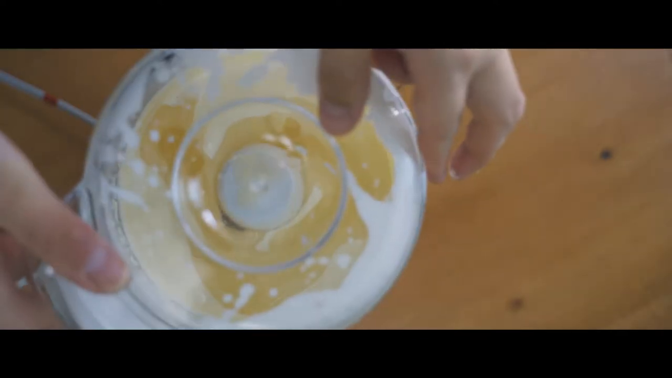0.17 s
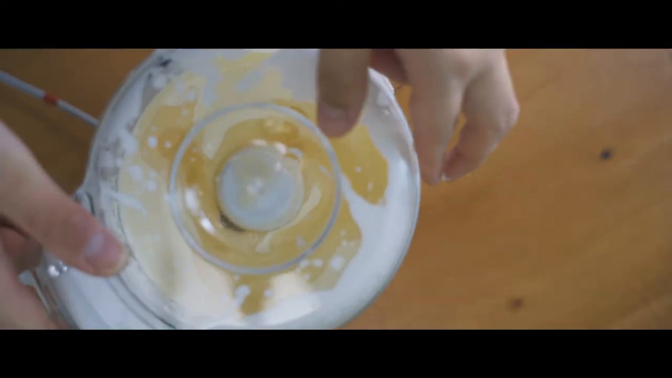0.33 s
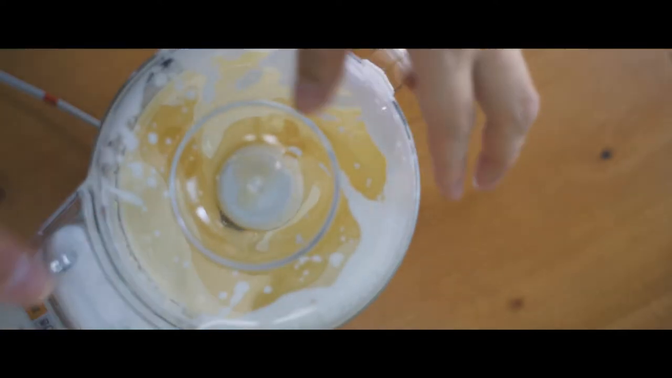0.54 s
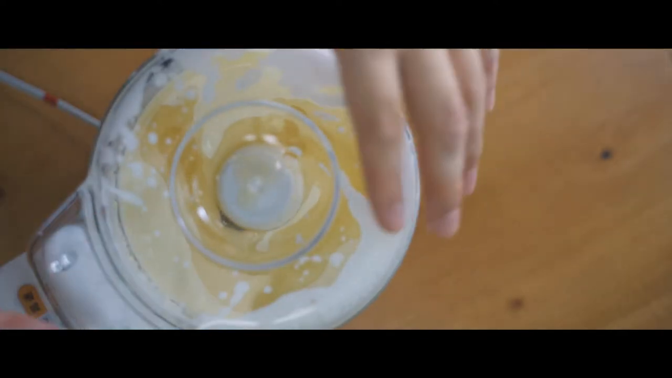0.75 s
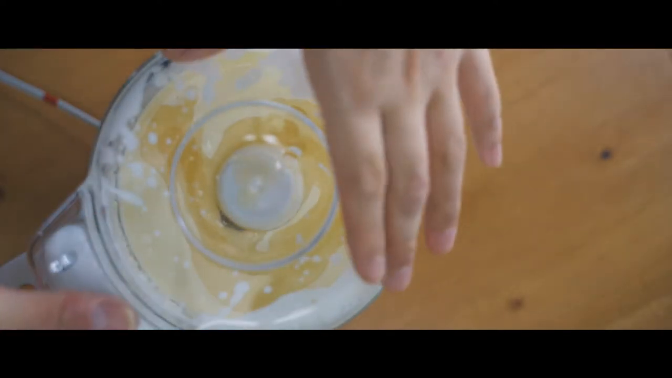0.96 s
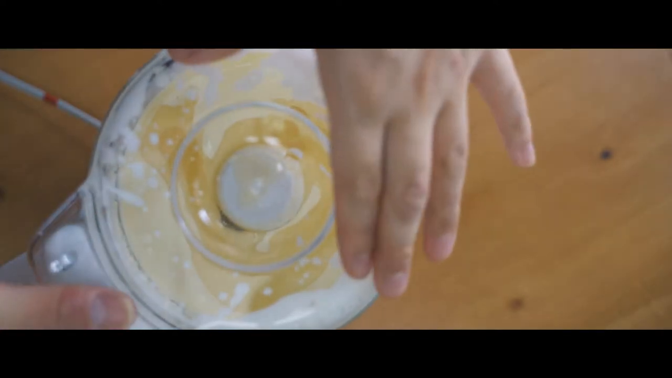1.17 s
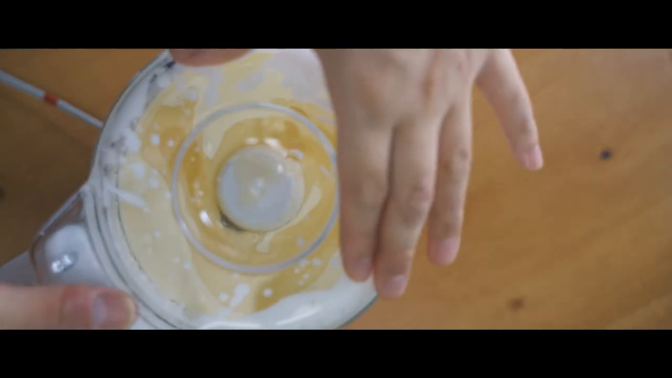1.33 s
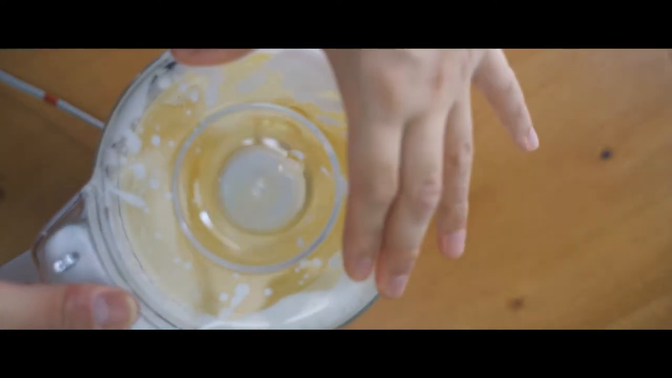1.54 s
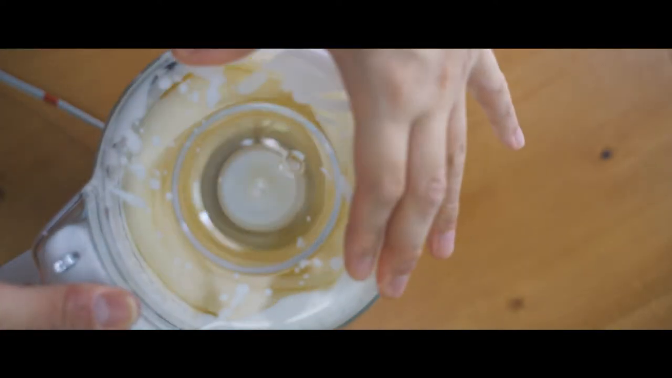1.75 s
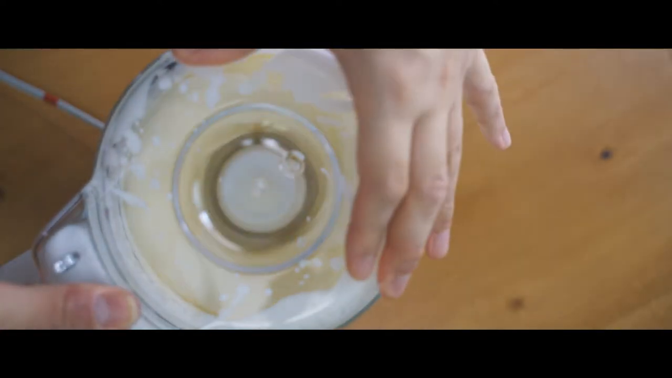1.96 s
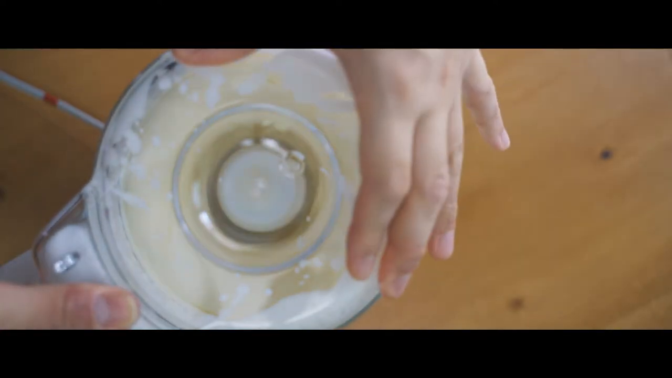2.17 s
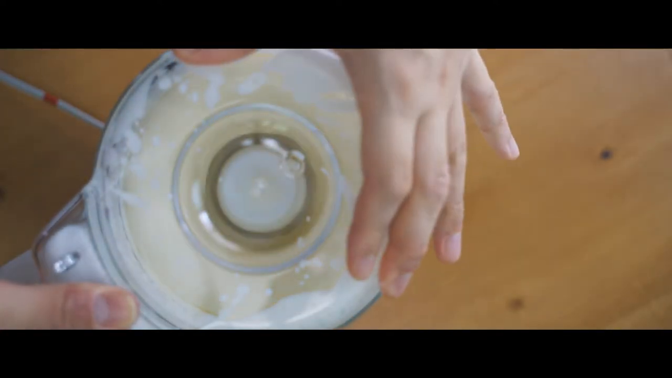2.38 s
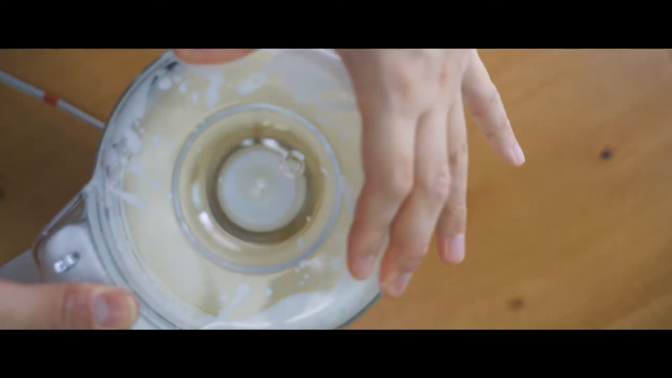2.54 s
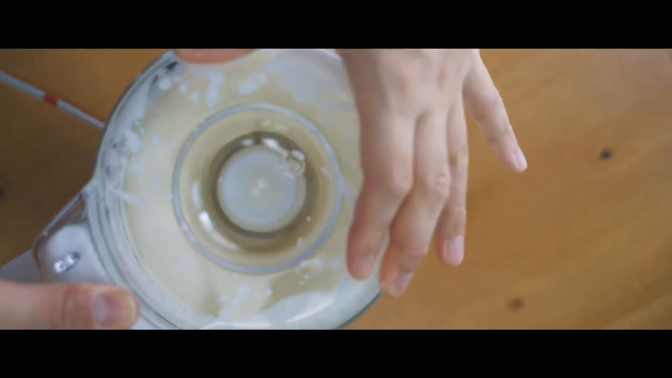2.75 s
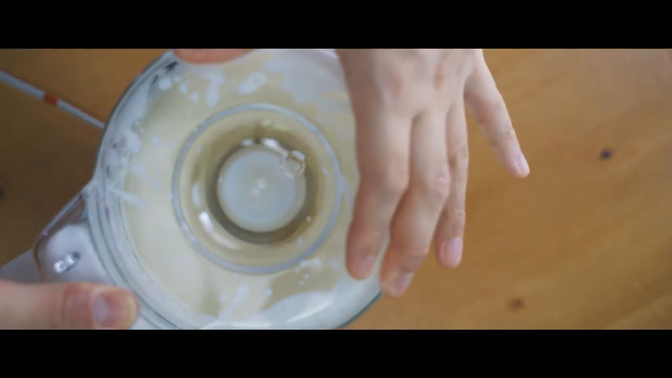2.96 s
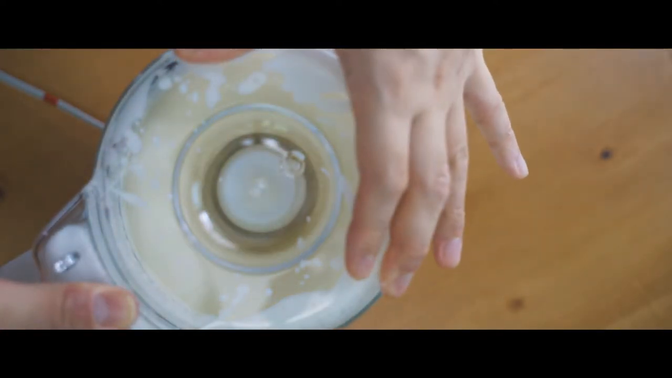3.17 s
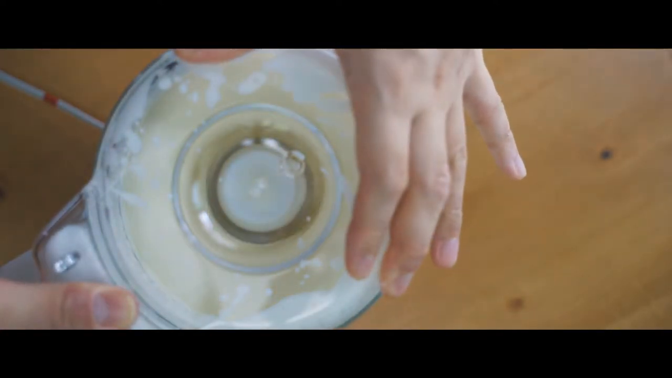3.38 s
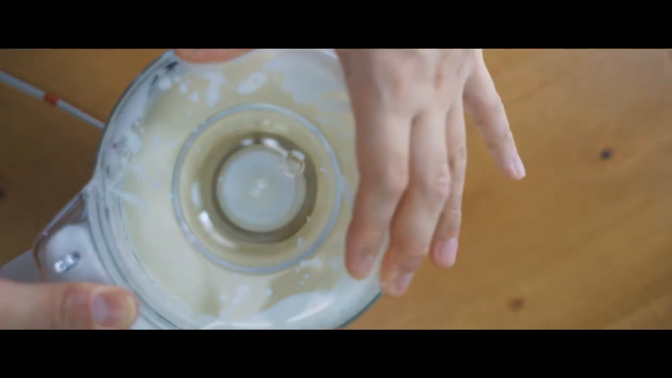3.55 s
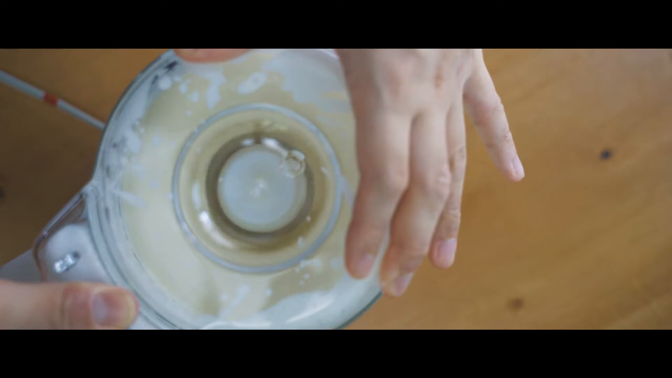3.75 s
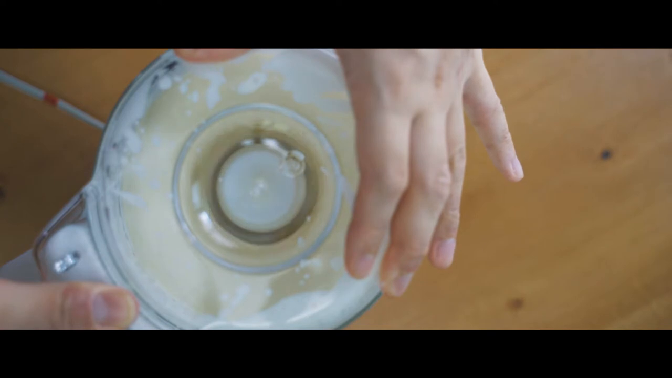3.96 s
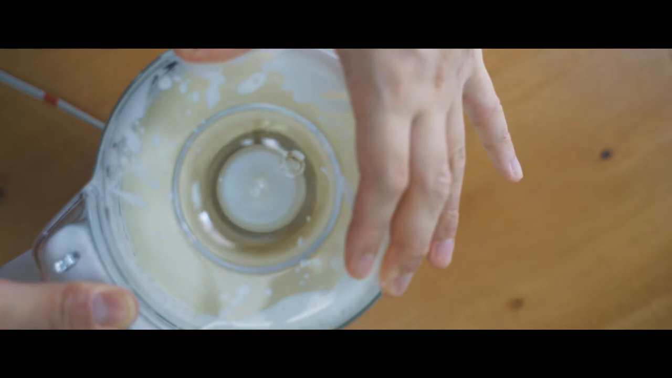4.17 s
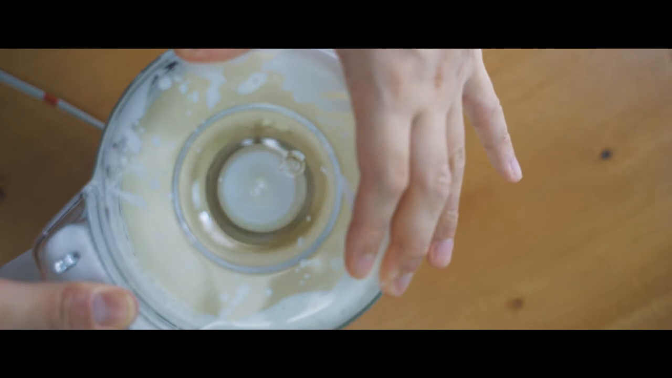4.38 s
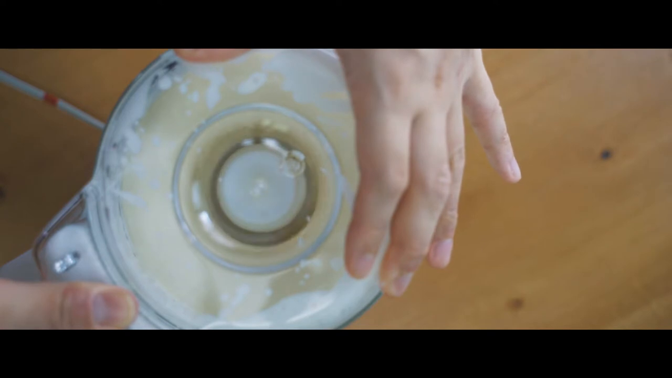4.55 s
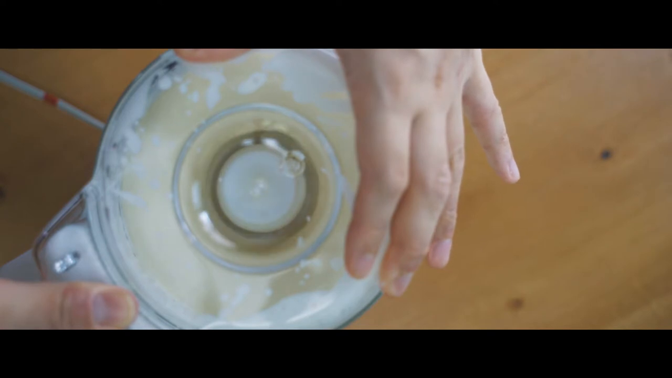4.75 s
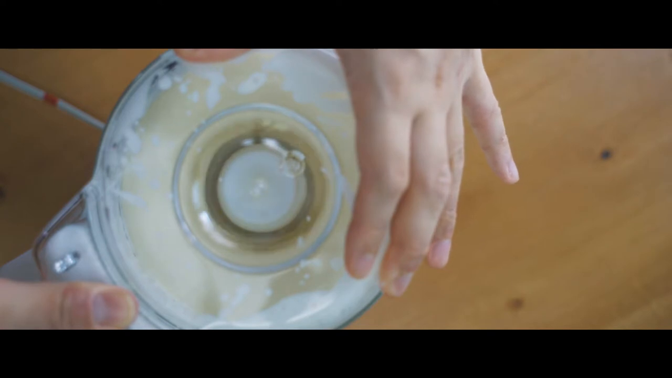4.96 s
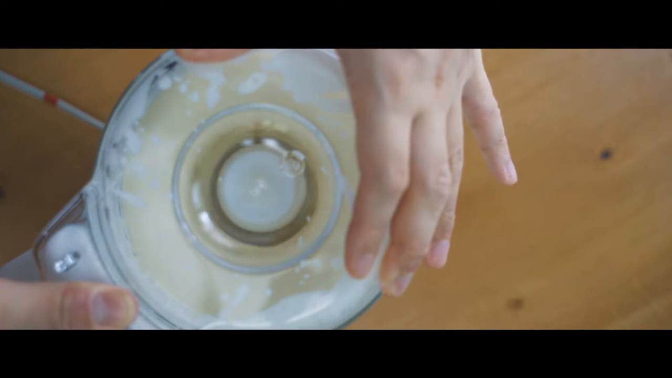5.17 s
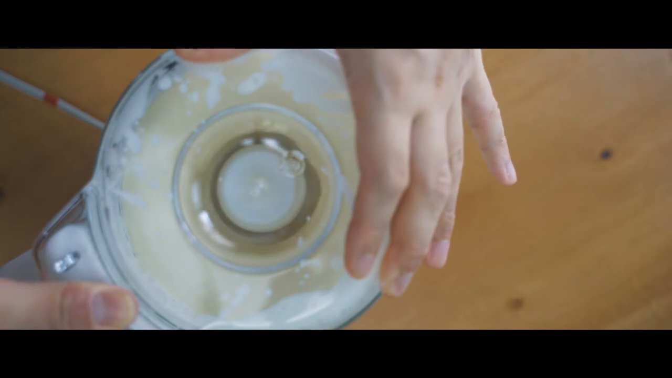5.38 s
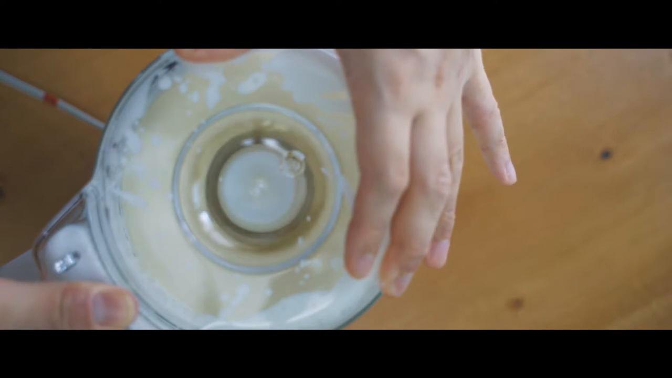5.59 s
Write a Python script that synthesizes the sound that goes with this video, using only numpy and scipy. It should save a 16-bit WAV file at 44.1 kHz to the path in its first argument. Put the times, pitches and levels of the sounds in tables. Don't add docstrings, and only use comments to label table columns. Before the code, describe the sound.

In a quiet kitchen, close up, a plastic bowl thumps, its lid clacks and grinds twice into the latch. Faint finger taps and a dry slide lead to a switch click; the motor jolts on, races up to a buzzing whine with churning batter and fan air, and runs steadily to the end.

```python
import sys
import numpy as np
from scipy import signal
from scipy.fft import rfft, irfft
from scipy.io import wavfile
from scipy.ndimage import uniform_filter1d

SR = 44100
rng = np.random.default_rng(int(sys.argv[2]) if len(sys.argv) > 2 else 0)


def ratio_of_db(decibels):
    return 10 ** (np.asarray(decibels, float) / 20)


def store_wav(level_fs):
    pcm = np.round(np.clip(np.atleast_2d(level_fs), -1, 1) * 32767)
    wavfile.write(sys.argv[1], SR, pcm.T.astype(np.int16))


N = 247842
T = np.arange(N) / SR
SWITCH_S, STILL_S, SPIN_UP_S = 1.541, 1.515, .108
MAINS_HZ, SURGE_S = 50.07, .0064

# frequency in Hz, density in dB per Hz.
KITCHEN_TONE = [(12, -68), (20, -19), (70, -20), (122, -27), (191, -41), (213, -37), (232, 3.5),
                (282, -0.5), (333, -15), (372, -10), (416, -9), (746, -15.5), (906, -16), (3640, -37),
                (15500, -45.5)]
# frequency in Hz, width in Hz, level in dB.
APPLIANCE_HUM = [(123, 34, -59.5), (185.6, 14, -62.5), (243.4, 15, -56.5), (286.8, 7.3, -56.5),
                 (369, 1.1, -59), (586, 2.2, -68)]
# frequency in Hz, left-right likeness (-1 to 1).
FAR_LIKENESS = [(60, 1), (150, -1.77), (380, -1.04), (950, 0.12), (2380, -0.23), (5980, -1.9),
                (15000, 0.19)]
# frequency in Hz, left-right likeness (clipped to 1).
NEAR_LIKENESS = [(60, -2), (150, 0.94), (380, 1), (950, 0.8), (2380, 0.63), (5980, -2.5), (15000, -1)]
# frequency in Hz, left over right in dB.
PORT_TILT = [(60, 0), (150, -0.5), (380, 1), (950, 1.0), (2380, 1.5), (5980, 0), (15000, 0)]
# frequency in Hz, t60 in seconds.
ROOM_T60 = [(250, 0.31), (1000, 0.097), (4000, 0.26), (12000, 0.025)]

# frequency in Hz, level in dB, t60 in seconds.
WALL_MODES = [(958, -2, .1), (1120, -8, .06), (1650, 0, .07), (1760, -4, .07), (2020, -7, .05),
              (2350, -7, .035), (2950, -10, .03)]
# frequency in Hz, level in dB, t60 in seconds.
RIM_MODES = [(3700, -19, .02), (3990, -1, 0.014), (4210, -2, 0.033), (5400, 8, 0.03), (6140, -15, 0.017),
             (9200, 7, 0.02)]
# frequency in Hz, density in dB per Hz.
SNAP_COLOUR = [(1200, -24), (2200, -6), (3000, -11), (4300, -2), (5600, -7), (6500, -6), (8900, -10),
               (15500, -24)]
# start in seconds, tick level in dB, tick pitch in Hz, thump in dB, wall in dB.
BOWL_KNOCKS = [
    (0.1558, -26, 4220, -30, -35),
    (0.2957, -42.5, 4030, -49, -55),
    (1.2715, -34.5, 4200, -56, -57),
    (1.5409, -37, 3630, -33, -40),
    (1.5534, -37, 2050, -30, -37),
    (1.9334, -30.5, 5250, -56, -60),
    (2.112, -34, 5140, -52.5, -45.5),
]
# start in seconds, tick level in dB, tick pitch in Hz, thump in dB, wall in dB.
LID_KNOCKS = [
    (0.398, -24, 4340, -54, -36.5),
    (0.3985, -23, 2160, -61, -55),
    (0.4406, -28, 2430, -35.5, -41.5),
    (0.4543, -21, 4110, -32.5, -42),
    (0.5558, -52, 3990, -34, -44.5),
    (1.2839, -43, 4340, -43, -63),
    (1.3442, -47, 3900, -44.5, -58),
    (1.4174, -60, 4300, -49.5, -59),
]
# start in seconds, tick level in dB, tick pitch in Hz, thump in dB, wall in dB.
LATCH_KNOCKS = [
    (0.3671, -23.5, 4150, -38, -32.5),
    (1.779, -46, 4500, -39, -50),
]
# start in seconds, length in seconds, wall level in dB, rim level in dB,
# change over the stroke in dB.
LID_STROKES = [
    (0.365, .085, -32, -36, -8),
    (0.453, 0.11, -27, -26.5, -19.5),
]
# start in seconds, length in seconds, wall level in dB, hiss level
# in dB, change over the stroke in dB.
FINGER_STROKES = [
    (1.272, 0.057, -65, -33, -18),
    (1.344, .03, -56, -45, -12),
]
# frequency in Hz, density in dB per Hz.
FINGER_COLOUR = [(880, -44), (1500, -14), (1650, -4), (3090, -18), (3340, -14), (4270, -8), (8620, -5),
                 (15500, -17)]

# frequency in Hz, width in Hz, level in dB.
JOLT_MODES = [(1900, 830, -28), (1180, 300, -37), (3630, 1300, -36.5), (447, 79, -67), (6270, 1700, -45)]
# time in seconds, load in dB.
BATTER_LOAD = [(1.65, -0.5), (1.9, -0.5), (2.6, -1), (2.98, -1.5), (3.1, 1), (3.7, -1.5), (3.95, 0.5),
               (4.3, -2), (4.55, 1.5), (5.62, -2)]
# time in seconds, rate in Hz.
CRUISE = [(2.2, 1650), (2.66, 1657.5), (3.15, 1672), (3.5, 1692), (3.92, 1707.5), (4.48, 1724),
          (5.04, 1733), (5.62, 1747)]
# multiple of mains (no unit), level in dB.
FIELD_HUM = [(1, -72), (2, -54.5), (3, -62), (6, -55.5), (9, -51.5), (12, -57.5)]
# frequency in Hz, width in Hz, level in dB.
BOWL_SHAKE = [(372.7, 29.4, -48), (430.3, 29, -49.5), (539.6, 44, -51.5), (589.6, 7.4, -61.5),
              (753.6, 35, -54), (1016.5, 55, -50), (2020, 210, -45)]
# frequency in Hz, density in dB per Hz.
CHURN_COLOUR = [(35, -43), (60, -10), (98, -59), (195, -16), (435, -5.5), (655, -15.5), (1020, -13),
                (1120, -15), (1480, -3.5), (1720, -2), (2270, -14), (3000, -26.5), (3900, -41),
                (6600, -120)]
# frequency in Hz, density in dB per Hz.
AIR_COLOUR = [(1500, -57), (2300, -5), (3000, -8.5), (4300, -12.5), (5700, -19), (9000, -18), (11500, -28),
              (13500, -23), (15500, -26)]
# surge sharpness (no unit), surge lag in mains cycles, wobble phase term
# in radians, brush fuzz in dB.
OVERTONE_THROB = [(4.2, -.04, -.3, -19), (2, 0, .5, -11), (.5, -.08, 1.9, -2), (.3, -.2, 3, -1),
                  (.3, 0, 3.2, 1), (.3, 0, 3.4, 3), (.3, 0, 3.5, 4), (.3, 0, 4.3, 8)]
OVERTONE_DB = [-35.5, -37, -49, -47.5, -55.5, -61, -67.5, -64]
# frequency in Hz, width in Hz, lift in dB.
HOUSING = [(1697, 30, 18), (2012, 25, 21), (1570, 60, 8), (1400, 250, 6), (1810, 90, 11), (2075, 50, 19),
           (4250, 600, 9), (5100, 300, 4)]


def evened(x):
    return x / np.sqrt(np.mean(x ** 2) + 1e-20)


def read(points, hz):
    f, value = np.transpose(points)
    return np.interp(np.log(hz + 1), np.log(f + 1), value)


def resonate(x, hz, width, order=1):
    turn = np.exp(2j * np.pi * np.cumsum(hz * np.ones(x.shape[-1])) / SR)
    r = np.exp(-np.pi * width / SR)
    smooth = signal.lfilter([(1 - r) ** order], np.poly([r] * order), x / turn + 1e-18)
    return 2 * (turn * smooth).real


def shaken(modes, order=1):
    shake = rng.standard_normal((N, len(modes))).T
    return sum(ratio_of_db(db) * evened(resonate(x, hz, width, order)) for x, (hz, width, db) in zip(shake, modes))


def hiss(colour, likeness, patchy_db):
    frames, hz = N // 256 + 5, np.fft.rfftfreq(1024, 1 / SR)
    a, b, c, d, patches = rng.standard_normal((frames, 513, 5)).T
    patches = uniform_filter1d(patches, size=10, axis=0)
    patches = evened(uniform_filter1d(patches, size=12, axis=1))
    like = np.clip(read(likeness, hz), -1, 1)[:, None]
    left = a + 1j * b
    right = like * left + np.sqrt(1 - like ** 2) * (c + 1j * d)
    z = np.array([left, right]) * ratio_of_db(read(colour, hz)[:, None] + patchy_db * patches)
    return evened(signal.istft(z, nperseg=1024, noverlap=768)[1][:, :N])


def kitchen():
    return ratio_of_db(-49.5) * hiss(KITCHEN_TONE, FAR_LIKENESS, patchy_db=1.0) + shaken(APPLIANCE_HUM)


def ring(x, modes, spread_db=0, detune=.012):
    t = np.arange(SR // 4) / SR
    body = np.zeros(len(t))
    for (hz, db, t60), (a, b) in zip(modes, rng.standard_normal((len(modes), 2))):
        body += ratio_of_db(db + spread_db * a - 60 * t / t60) * np.sin(2 * np.pi * hz * (1 + detune * b) * t)
    return signal.oaconvolve(x, body / np.sqrt(np.mean(body[:400] ** 2)))[:N]


def coloured(x, points):
    hz = np.fft.rfftfreq(len(x), 1 / SR)
    return evened(irfft(rfft(x) * ratio_of_db(read(points, hz)), len(x)))


def knock(tick_db, tick_hz, thump_db, wall_db, thump_hz):
    t = np.arange(SR // 4) / SR
    blow = np.zeros(100)
    blow[[0, 37, 95]] = .5, .8, -.4
    thump = ratio_of_db(thump_db + 5.5 - 60 * t / 0.076) * np.sin(2 * np.pi * thump_hz * t)
    thump *= 1 - np.exp(-t / 0.0015)
    wall = ratio_of_db(wall_db + 2.5) * ring(blow, WALL_MODES, spread_db=2.5)[:len(t)]
    tick_pair = [(tick_hz, 0, .022), (tick_hz * 1.04, -1, .022)]  # Hz, dB, t60 s
    tick = ring(blow[:30], tick_pair, detune=.005)[:len(t)]
    snap_fade = ratio_of_db(-1.5 - 60 * t / 0.019) + ratio_of_db(-13 - 60 * t / 0.25)
    snap = coloured(rng.standard_normal(len(t)), SNAP_COLOUR) * snap_fade
    return thump + wall + ratio_of_db(tick_db - 6) * (tick + ratio_of_db(-5) * snap)


def knocks():
    out = np.zeros(N + SR)
    for rows, thump_hz in (BOWL_KNOCKS, 441), (LID_KNOCKS, 263), (LATCH_KNOCKS, 650):
        for s, *strengths in rows:
            sound = knock(*strengths, thump_hz)
            out[round((s + .0015) * SR):][:len(sound)] += sound
    return out[:N]


def room(x):
    taps = np.zeros((2, SR // 2))
    starts = np.arange(150, SR // 2 - 20, 20)
    at = starts + rng.integers(0, 20, (2, len(starts)))
    np.put_along_axis(taps, at, rng.choice([-1., 1.], at.shape), 1)
    hz, t, z = signal.stft(taps, SR, nperseg=256)
    fade = ratio_of_db(-60 * t / read(ROOM_T60, hz)[:, None])
    tail = signal.istft(z * fade, SR, nperseg=256)[1]
    return signal.fftconvolve(x[None], tail / np.linalg.norm(tail[0]), axes=1)[:, :N]


def grind():
    grip_s, let_go_db_per_s = 0.0031, 500
    slips = rng.standard_normal((N, 2)).T * (rng.random((N, 2)).T < 1500 / SR)
    wall = evened(ring(slips[0], WALL_MODES))
    rim = evened(.5 * evened(ring(slips[1], RIM_MODES)) + coloured(slips[1], SNAP_COLOUR))
    finger = coloured(slips[1], FINGER_COLOUR)
    out = np.zeros(N)
    for rows, top in (LID_STROKES, rim), (FINGER_STROKES, finger):
        for s, length, wall_db, top_db, fade_db in rows:
            u = T - s
            press_db = fade_db * np.clip(u / length, 0, 1) - let_go_db_per_s * np.maximum(u - length, 0)
            press = np.clip(u / grip_s, 0, 1) * ratio_of_db(press_db)
            out += press * (ratio_of_db(wall_db - 6.0) * wall + ratio_of_db(top_db - 9.0) * top)
    return out


def surge(sharp, lag=0):
    return evened(np.exp(sharp * np.cos(2 * np.pi * (MAINS_HZ * (T - SURGE_S) - lag))))


def jolt():
    since = np.maximum(T - SWITCH_S, 0)
    first_slap = ratio_of_db(-60 * since / 0.05)
    slaps = ratio_of_db(-8.5 - 60 * since / 2.1) * surge(0.6, -0.31)
    return shaken(JOLT_MODES, order=2) * (first_slap + slaps)


def drift(rate_hz):
    return evened(sum(np.cos(2 * np.pi * (f * rate_hz * T + rng.random())) for f in np.geomspace(.1, 1, 12)))


def load_db():
    return np.interp(T, *np.transpose(BATTER_LOAD))


def thick():
    return np.exp(-np.maximum(T - SWITCH_S, 0) / 1.4)


def bar_rate():
    spin = 1 - np.exp(-np.maximum(T - STILL_S, 0) / SPIN_UP_S)
    return np.interp(T, *np.transpose(CRUISE)) * spin


def field_hum():
    strain_db = 13 * np.exp(-abs(T - SWITCH_S - .045) / .1)
    hum = np.zeros(N)
    for k, db in FIELD_HUM:
        waver_db = 1.5 * drift(16) + strain_db * min(1, 2 / k)
        hum += ratio_of_db(db + waver_db) * np.sqrt(2) * np.cos(2 * np.pi * k * MAINS_HZ * T)
    rock_hz, rock_s = 9.9, 1.582
    rock = 0.98 * np.exp(-abs(T - rock_s) / 0.15) * np.cos(2 * np.pi * rock_hz * (T - rock_s))
    return hum * (1 + rock)


def motor():
    batter = hiss(CHURN_COLOUR, NEAR_LIKENESS, patchy_db=1) * surge(.3, .1)
    churn = ratio_of_db(-36.5) * batter + shaken(BOWL_SHAKE, order=2)
    shaft_turn = 2 * np.pi * np.cumsum(bar_rate() / 19) / SR
    shaft = ratio_of_db(-62 + 1.4 * drift(6)) * np.sqrt(2) * np.cos(shaft_turn)
    air = ratio_of_db(-48.5) * hiss(AIR_COLOUR, NEAR_LIKENESS, patchy_db=0.5) * surge(0.013)
    opening = ratio_of_db(-2 * thick())
    return churn * ratio_of_db(0.29 * load_db()) + field_hum() + shaft + air * opening


def whine():
    bars_hz = bar_rate()
    turn = 2 * np.pi * np.cumsum(bars_hz + 0.2 * drift(8)) / SR
    mains = 2 * np.pi * MAINS_HZ * (T - SURGE_S)
    drive_db = {1: 0.5 + load_db(), 2: 8.5 + 0.9 * load_db() - 10 * (1 - thick())}
    out = np.zeros((2, N))
    for k, (sharp, lag, wobble, fuzz_db) in enumerate(OVERTONE_THROB, 1):
        tone = np.sqrt(2) * np.cos(k * turn + wobble * np.sin(mains - 1.8))
        chatter = rng.standard_normal((N, 2)).T
        fuzz = evened(resonate(chatter, k * .995 * bars_hz, 200 + 22 * k ** 2, order=2))
        swing_db = drive_db.get(k, 0) + 0.39 * drift(12)
        if k > 3:
            swing_db -= 10 * k * np.exp(-np.maximum(T - STILL_S, 0) / SPIN_UP_S)
        echo = .2 * surge(5, lag + .36) * (k == 1)
        out += ratio_of_db(OVERTONE_DB[k - 1] + swing_db) * (tone + ratio_of_db(fuzz_db) * fuzz) * (surge(sharp, lag) + echo)
    lifted = out + sum(ratio_of_db(db) * resonate(out, hz, width) for hz, width, db in HOUSING)
    sideband = np.sqrt(2) * np.cos(turn + 6 * mains)
    sing = resonate(sideband, 2012, 9, order=2)
    return ratio_of_db(-11.5) * lifted + ratio_of_db(-37) * sing


def scene():
    running = np.clip((T - SWITCH_S) / 0.002, 0, 1)
    gripping = np.clip((T - 1.62) / .08, 0, 1)
    hands = knocks() + grind() + running * jolt()
    tone = gripping * whine()
    echo = ratio_of_db(-9) * room(hands) + ratio_of_db(-16) * room(tone.mean(0))
    machine = hands + tone + running * motor()
    return machine + echo + kitchen()


def top_cut(x):
    return signal.sosfilt(signal.butter(12, 15660, fs=SR, output="sos"), x)


def record(dry):
    left_lag_s, most_radians = -4.2 / SR, .9
    hz = np.fft.rfftfreq(N, 1 / SR)
    turn = most_radians * np.tanh(np.pi * hz * left_lag_s / most_radians)
    half = ratio_of_db(read(PORT_TILT, hz) / 2) * np.exp(-1j * turn)
    ports = irfft(rfft(dry, axis=1) * np.array([half, 1 / half]) * (hz < 15780), N, axis=1)
    return top_cut(ports)


dry = scene()
out = record(dry)
store_wav(out)
```